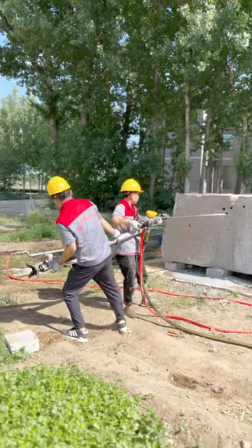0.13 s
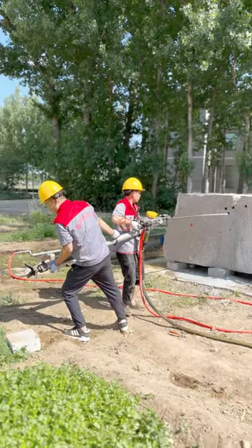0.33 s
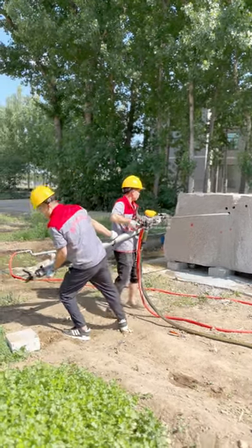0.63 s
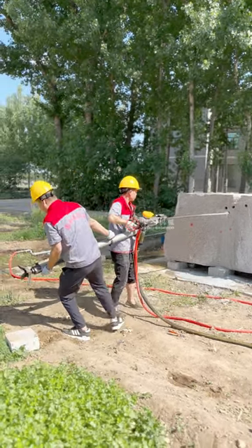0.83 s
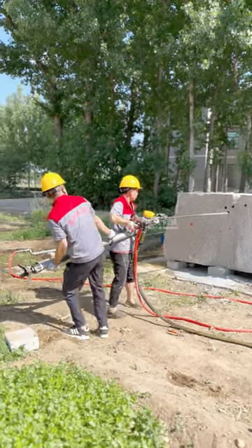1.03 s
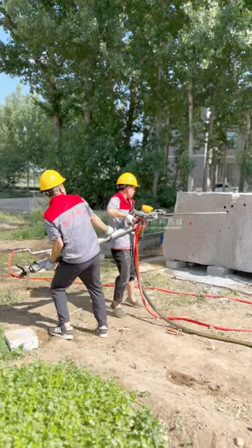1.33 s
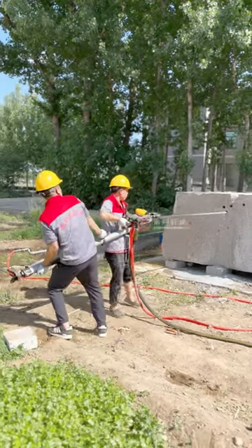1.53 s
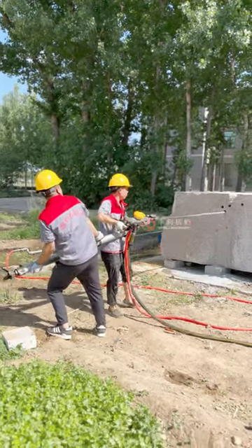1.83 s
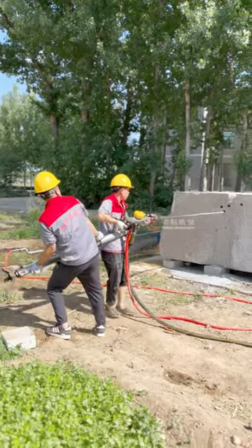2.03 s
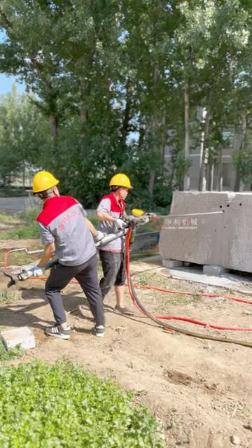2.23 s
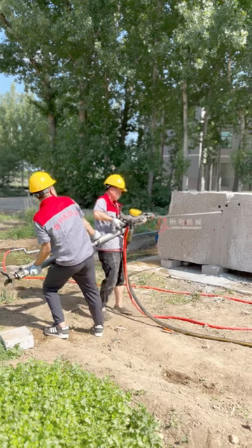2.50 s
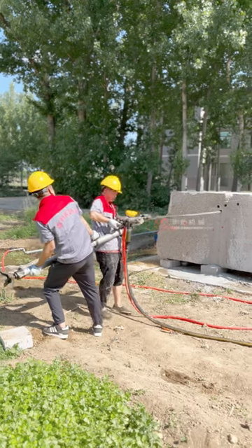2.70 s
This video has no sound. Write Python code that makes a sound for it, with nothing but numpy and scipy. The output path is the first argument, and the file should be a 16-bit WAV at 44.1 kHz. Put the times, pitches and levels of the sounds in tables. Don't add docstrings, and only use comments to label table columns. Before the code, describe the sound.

Continuous rapid hammering of a pneumatic rock drill on stone, around 25 strokes a second, slowing very slightly; throaty exhaust, bright metal clacks and breathy air whistle, in open air with faint short reflections, handheld stereo microphone.

```python
import sys
import numpy as np
from scipy import signal
from scipy.fft import rfft, irfft, next_fast_len
from scipy.io import wavfile

SR = 44100
rng = np.random.default_rng(int(sys.argv[2]) if len(sys.argv) > 2 else 0)


def invert_db(level):
    return 10 ** (np.asarray(level, dtype=float) / 20)


def materialize(psi):
    bounded = np.clip(np.atleast_2d(psi).T, -1, 1)
    quanta = np.round(bounded * 32767).astype(np.int16)
    wavfile.write(sys.argv[1], SR, quanta)


N = 126126

# time in s, steel in dB, valve chest in dB, whistle in dB.
FEED_BY_TIME = [
    (0, 0, 2, 4),
    (.6, 1.5, -3, 4),
    (1.1, -1, -0.5, 2),
    (1.55, -1.5, 2, 1),
    (1.9, -2, -1.5, -6.5),
    (2.3, -2, 4, 3),
    (2.5, 1.5, -1.5, -1.5),
    (2.86, 2, -0.5, 3.5),
]


def rms_one(x):
    return x / np.sqrt(np.mean(x ** 2) + 1e-20)


def column(rows, at, order):
    rows = np.array(rows)
    return np.interp(at, rows[:, 0], rows[:, order])


def at_hz(points, hz):
    points = np.array(points)
    return np.interp(np.log(hz), np.log(points[:, 0]), points[:, 1])


def drift(rate_hz):
    r = np.exp(-40 * np.pi * rate_hz / SR)
    white = rng.standard_normal(N // 20 + 2002)
    slow = signal.lfilter([1], [1, -2 * r, r * r], white)[2000:]
    return np.interp(np.arange(N) / 20, np.arange(len(slow)), rms_one(slow - slow.mean()))


def ring(clicks, hz, t60_s):
    r, w = invert_db(-60 / (t60_s * SR)), 2 * np.pi * hz / SR
    return signal.lfilter([0, np.sin(w)], [1, -2 * r * np.cos(w), r * r], clicks + 1e-18)


def bandpass(x, order, low_hz, high_hz):
    return signal.sosfilt(signal.butter(order, [low_hz, high_hz], "band", fs=SR, output="sos"), x)


def strokes():
    # time in s, rate in strokes per s.
    stroke_rate = [(0.0, 24.91), (0.17, 25.02), (0.34, 25.17), (0.5, 24.91), (0.67, 24.95), (0.84, 25.01),
                   (1.01, 24.93), (1.18, 24.96), (1.35, 24.95), (1.51, 24.6), (1.68, 24.77), (1.85, 24.85),
                   (2.02, 24.68), (2.19, 24.63), (2.36, 24.45), (2.52, 24.42), (2.69, 24.63), (2.86, 23.91)]
    t = np.arange(-SR, N) / SR
    done = np.cumsum(column(stroke_rate, t, order=1)) / SR
    first_stroke_s = .0409
    return done - np.interp(first_stroke_s, t, done)


def train(share, db, spread_db, jitter_s, slip=0):
    done = strokes()
    due = np.arange(-20, 72) * (1 + slip / 71) + share
    at = np.interp(due, done, np.arange(len(done)), right=np.nan)
    luck = rng.standard_normal((len(at), 2))
    ok = at < len(done) - 200
    where = (at[ok] + luck[ok, 0] * jitter_s * SR).astype(int)
    click_db = np.broadcast_to(db, done.shape)[where] + spread_db * luck[ok, 1]
    clicks = np.zeros(len(done))
    clicks[where] = invert_db(click_db)
    return clicks


def banded_noise(spectrum, low_hz, count, patchy_db, flicker_hz):
    out, together = 0, drift(flicker_hz)
    borders_hz = low_hz * 2 ** (np.arange(count + 1) / 3)
    white = rng.standard_normal((2, N))
    for k, (low, high) in enumerate(zip(borders_hz, borders_hz[1:])):
        band = bandpass(white[k % 2], 2, low, min(high, .45 * SR))
        flicker_db = patchy_db * (.5 * together + drift(flicker_hz))
        out = out + band * invert_db(at_hz(spectrum, np.sqrt(low * high)) + flicker_db)
    return rms_one(out)


def struck(hits, modes, jitter_s, rattle_s, loose):
    clicks = sum(train(share, db, spread_db, jitter_s, slip) for share, slip, db, spread_db in hits)[SR:]
    r = np.exp(-1 / (rattle_s * SR))
    smear = signal.lfilter([np.sqrt(1 - r * r)], [1, -r], clicks + 1e-18)
    out = 0
    for hz, db, t60_s in modes:
        rattle = smear * rng.choice([-1., 1.], N)
        out = out + invert_db(db) * ring((1 - loose) * clicks + loose * rattle, hz, t60_s)
    return out


def escaping_air():
    # frequency in Hz, level in dB per Hz.
    hiss_colour = [(700, 1), (1500, -2), (2800, 1.5), (3700, -3), (6000, 0.5), (7600, -3), (11000, -3),
                   (15800, -21)]
    # share of stroke, hiss in dB, port whistle in dB.
    air_flow = [
        (0, 5, -5.5),
        (.2, 1.5, 2.5),
        (.4, 3.5, 3),
        (.55, -4, -18),
        (.68, 2.5, -23),
        (.78, -0.5, -11),
        (.9, 3, -34),
        (1, -6, -18),
    ]
    share, t = strokes()[SR:] % 1, np.arange(N) / SR
    hiss = banded_noise(hiss_colour, 661.4, count=14, patchy_db=1.5, flicker_hz=26.0)
    hiss = hiss * invert_db(-32 + column(air_flow, share, order=1) + 2 * drift(250.0))
    whistle_hz, whistle_width_hz = 1115, 94
    tone = rms_one(ring(rng.standard_normal(N), whistle_hz, 2.23 / whistle_width_hz))
    whistle_share = (share + 0.107 - 0.22 * t / t[-1]) % 1
    whistle_db = -39.5 + column(air_flow, whistle_share, order=2) + column(FEED_BY_TIME, t, order=3)
    return hiss + tone * invert_db(whistle_db)


def chuck():
    # share of stroke, slip of that share over the run, level in dB, spread in dB.
    knocks = [(.025, 0.00044, -27, 2.5), (.26, 0.036, -29, -2.5), (.35, 0, -31, 3), (.46, 0, -32, 3),
              (.765, 0, -30, 2.5), (.97, 0.0042, -26.5, 3)]
    # frequency in Hz, level in dB, t60 in s.
    chuck_modes = [(3330, -0.5, .008), (2680, -4, 0.009), (2140, -5.5, 0.018), (1960, -12.5, .01)]
    return struck(knocks, chuck_modes, jitter_s=.0004, rattle_s=0.0007, loose=0.75)


def valve():
    # share of stroke, slip of that share over the run, level in dB, spread in dB.
    clacks = [(0.79, 0.0024, -26.5, 6), (0.69, 0, -32, 1), (0.96, 0.0017, -24, 1.5), (.015, 0.0022, -27, 2)]
    # frequency in Hz, level in dB, t60 in s.
    chest_modes = [(4190, -3, 0.014), (4350, -5, 0.011), (5000, -13, 0.0039), (11200, 0.5, 0.0032)]
    feed_db = column(FEED_BY_TIME, np.arange(N) / SR, order=2)
    return invert_db(feed_db) * struck(clacks, chest_modes, jitter_s=.0002, rattle_s=0.00034, loose=0.34)


def drill_steel():
    # share of stroke, slip of that share over the run, level in dB, spread in dB.
    blows = [(.332, 0.0046, -24, 1.5), (.418, 0, -22.5, 0.5), (.485, 0, -26, 1), (.545, 0, -30, 3),
             (.815, -.055, -26, 3.5), (.03, 0.012, -40, 5.5)]
    # frequency in Hz, level in dB, t60 in s.
    steel_modes = [(8370, -5, 0.012), (8410, -1.5, 0.016), (8530, -5.5, 0.0079), (8700, -4.5, 0.0058),
                   (7040, -9, 0.011), (6440, -30, .01)]
    feed_db = column(FEED_BY_TIME, np.arange(N) / SR, order=1)
    return invert_db(feed_db) * struck(blows, steel_modes, jitter_s=.00012, rattle_s=0.00035, loose=0.37)


def exhaust():
    # share of stroke, cavity in Hz, t60 in s, level at start in dB, level at end in dB.
    air_puffs = [(0.018, 112.0, 0.018, -8.9, -8.0), (0.154, 501.0, 0.254, -36.0, -29.1),
                 (0.199, 287.7, 0.233, -18.2, -14.4), (0.228, 198.0, 0.031, -25.9, -17.6),
                 (0.413, 264.1, 0.026, -13.2, -8.0), (0.487, 46.3, 0.299, -27.0, -28.5),
                 (0.49, 593.1, 0.238, -45.0, -32.6), (0.533, 110.0, 0.066, -12.7, -14.5),
                 (0.577, 550.4, 0.173, -23.0, -45.0), (0.666, 305.3, 0.126, -16.9, -25.6),
                 (0.693, 152.1, 0.295, -18.4, -37.5), (0.799, 340.6, 0.3, -23.0, -32.0),
                 (0.825, 182.0, 0.022, -15.3, -11.8), (0.881, 651.9, 0.242, -31.8, -31.0),
                 (0.953, 429.1, 0.265, -30.6, -27.2)]
    # frequency in Hz, level in dB per Hz.
    roar_colour = [(30, -16), (90, -6.5), (150, -6), (330, -2), (470, -7), (550, 1.5), (800, -15),
                   (1200, -17.5)]
    out, along = 0, np.clip(np.arange(-SR, N) / N, 0, 1)
    for share, hz, t60_s, start_db, end_db in air_puffs:
        clicks = train(share, start_db + (end_db - start_db) * along, spread_db=.6, jitter_s=.00005)
        highpass = signal.butter(2, .85 * hz, "high", fs=SR, output="sos")
        out = out + signal.sosfilt(highpass, ring(clicks, hz, t60_s))
    out = bandpass(out, 3, 42, 1000)[SR:]
    return out + invert_db(-32) * banded_noise(roar_colour, 34.77, count=16, patchy_db=1.5, flicker_hz=9.1)


def echoed(metal):
    # delay in s, level in dB.
    reflections = [
        (0.012, -14),
        (0.028, -18),
        (0.063, -13),
    ]
    return metal + sum(invert_db(db) * np.roll(metal, int(s * SR)) for s, db in reflections)


def ports(x):
    # frequency in Hz, lead of the left in radians.
    left_lead = [(0, 0), (300, .3), (600, .5), (1200, .15), (1750, -.1), (2500, 2.4), (3270, .4),
                 (5000, 1.2), (5900, 3.14), (7900, 6.28), (16000, 17.55)]
    # frequency in Hz, left minus right in dB.
    left_over_right = [(60, 0), (130, -.6), (290, -0.5), (640, -4.5), (1410, 2), (3100, -3.5), (6820, 0),
                       (15000, -0.5)]
    # frequency in Hz, unrelated part against the shared sound in dB.
    stray_share = [(60, -32), (300, -20), (700, -17), (1700, -24), (3000, -6), (5900, -17), (10000, -21),
                   (15000, -15)]
    size = next_fast_len(N + SR // 2)
    hz = np.arange(size // 2 + 1) * SR / size + 1e-3
    tails = rng.standard_normal((2, SR // 6)) * invert_db(np.linspace(0, -30, SR // 6))
    tails = tails / np.sqrt(np.sum(tails ** 2, axis=1, keepdims=True))
    stray = rfft(tails, size) * invert_db(at_hz(stray_share, hz))
    half = invert_db(at_hz(left_over_right, hz) / 2) * np.exp(.5j * column(left_lead, hz, order=1))
    return irfft(rfft(x, size) * (np.array([half, 1 / half]) + stray), size)[:, :N]


def scene():
    metal = echoed(chuck() + valve() + drill_steel())
    return ports(escaping_air() + metal + exhaust())


def roll_off(x):
    return signal.sosfilt(signal.butter(12, 16090, fs=SR, output="sos"), x)


def record(dry):
    mix = 0.85 * np.tanh(dry / 0.75)
    return roll_off(mix)


dry = scene()
out = record(dry)
materialize(out)
```